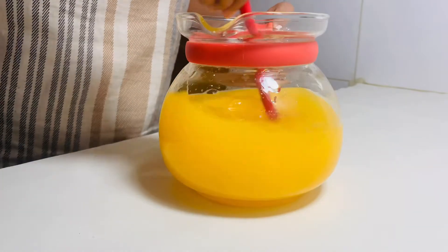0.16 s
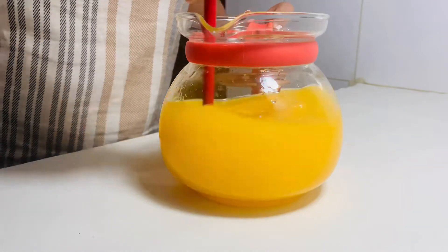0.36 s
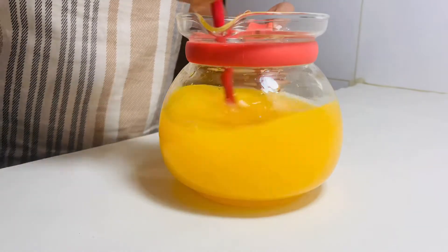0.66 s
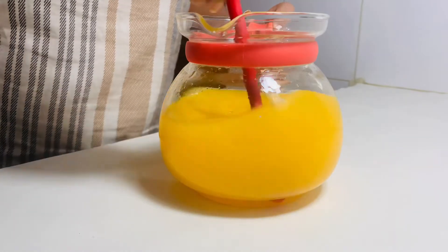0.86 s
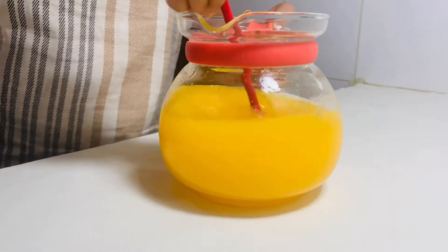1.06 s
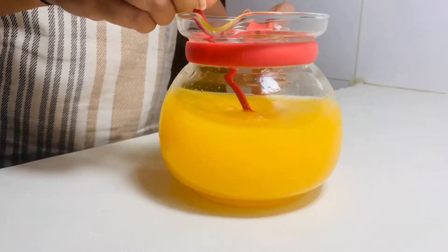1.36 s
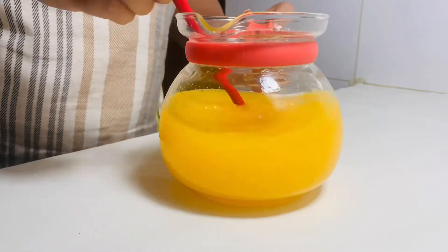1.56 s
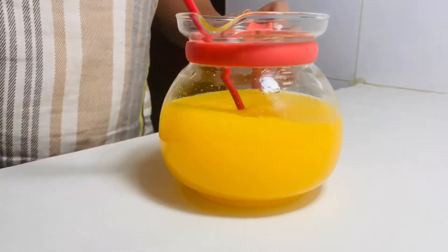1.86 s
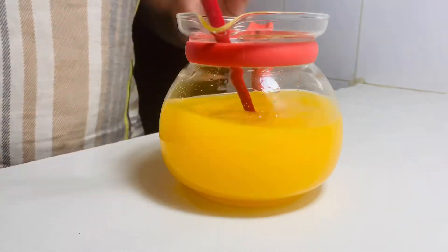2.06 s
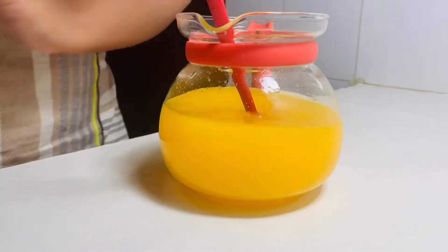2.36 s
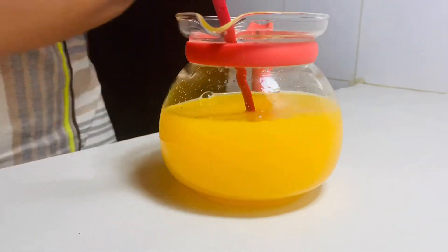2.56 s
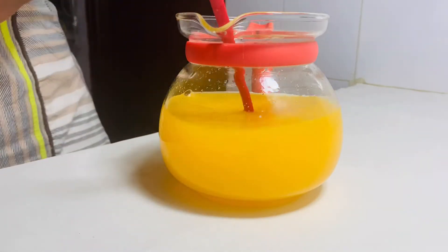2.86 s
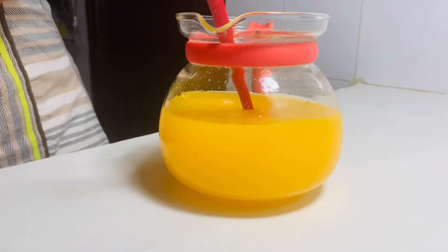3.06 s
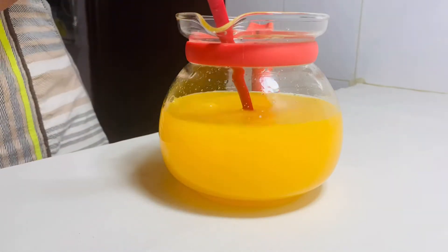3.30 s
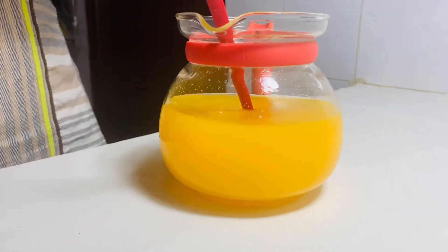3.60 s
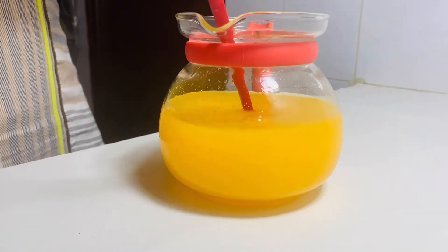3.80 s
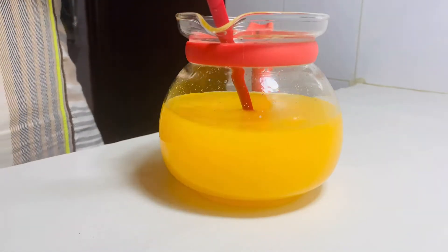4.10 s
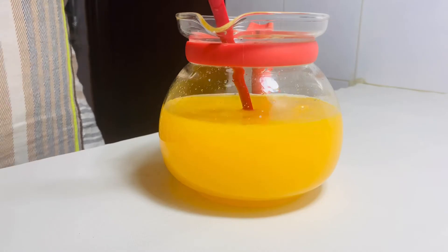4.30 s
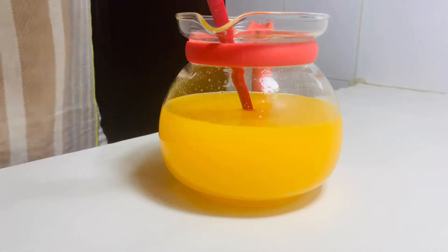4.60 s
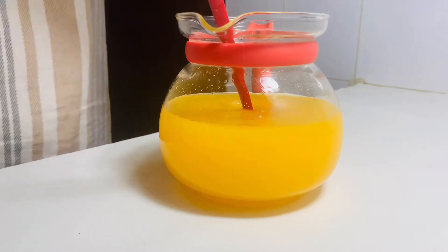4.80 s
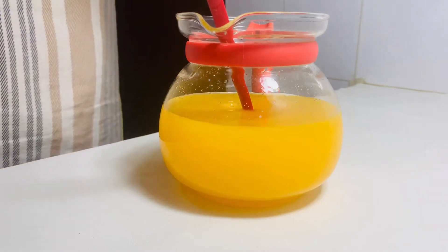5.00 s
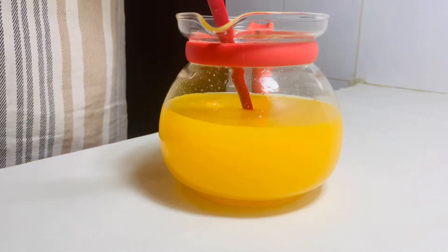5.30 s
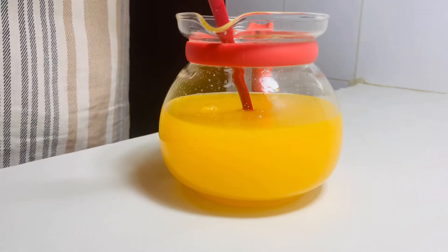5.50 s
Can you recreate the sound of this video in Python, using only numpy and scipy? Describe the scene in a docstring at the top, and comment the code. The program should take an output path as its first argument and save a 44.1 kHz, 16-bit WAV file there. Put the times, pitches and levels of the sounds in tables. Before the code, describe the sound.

Close stereo pickup of a quiet kitchen with a short hard echo. Spoon touches on a juice-filled glass jug, with watery swirls and bubbles, end in a crisp cluster of clinks. After a soft cloth swish comes a low gulp and a quick booming tub clatter slightly farther off, then a crackling, hollow pour that becomes fine hiss and stops with stray ticks.

```python
"""In a small kitchen, a spoon stirs juice in a round glass jug: it ticks on the wall, the juice plops,
and the handle clinks to rest in the neck. Each touch is a click of noise plus fading glass tones.
Clothes rustle as soft noise; then a hollow tub is picked up with two low gulps and bumped down, booming.
Something is poured: gushes of noise that sound the air in the tub, and a fine hiss that swells and dies away.
Single grains tick in the stream, and low room noise with a hum lies under it all."""
import sys
import numpy as np
from scipy import signal
from scipy.fft import rfft, irfft
from scipy.io import wavfile
from scipy.ndimage import uniform_filter1d

SR = 44100
rng = np.random.default_rng(int(sys.argv[2]) if len(sys.argv) > 2 else 0)


def unload_wav(signal):
    """Save mono or channel-first audio to the path in sys.argv[1] as 16-bit WAV at rate SR, clipped to [-1, 1]."""
    wavfile.write(
        sys.argv[1],
        SR,
        np.round(np.clip(np.atleast_2d(signal).T, -1, 1) * 32767).astype(np.int16),
    )


N = 249165  # length in samples
TIME = np.arange(N) / SR  # s

# All levels in the tables are relative: each source adds its own gain later.

# The kitchen at rest, colour of its noise: [f/Hz, level/dB]
FLOOR_COLOUR = [(20, -36), (40, 3), (60, 1.5), (120, 6.5), (180, -1), (300, -6.5), (450, -5.5), (700, -20),
                (1200, -23), (3000, -27.5), (8000, -31), (16000, -28.5)]
# Mains hum: [f/Hz, level/dB]
HUM_TONES = [(117, -72), (234, -77), (351, -86), (467, -81.5)]
# How long the room's echo takes to fade by 60 dB: [f/Hz, t60/s]
ROOM_T60 = [(100, 0.86), (500, 0.4), (2000, 0.37), (3200, 0.38), (4600, 0.41), (6500, 0.33), (10000, 0.27),
            (16000, 0.16)]
# Colour of the room's echo: [f/Hz, level/dB]
ROOM_COLOUR = [(60, -9), (500, 0), (4000, -1.5), (8000, -4), (16000, -1)]
# How alike noise is at the two microphones: [f/Hz, likeness from 0 to 1]
LIKENESS = [(60, 0.65), (250, 0.8), (600, 0.28), (1000, 0.3), (1700, 0.34), (2800, 0.23), (6000, 0.033),
            (8000, 1), (16000, 1)]
# How much louder noise is on the left than on the right: [f/Hz, level/dB]
BALANCE = [(60, -5.5), (130, -6.5), (300, -5), (550, 0.5), (2000, 0.5), (5000, -2.5), (8000, -0.5)]
# How far the left microphone leads, apart from the delay below: [f/Hz, turn/rad]
LEFT_TURN = [(100, 0), (240, 1.8), (330, 3.4), (490, 2), (600, 3), (1000, 2.5), (1700, 6.28)]
LEFT_LAG_S = 0.0001763  # the left microphone hears the sound this much later
TREBLE_LIMIT_HZ = 15900

# Colour of rustling cloth: [f/Hz, level/dB]
CLOTH_COLOUR = [(150, -4), (400, 8.5), (800, -4), (4500, -6.5), (7000, -15), (16000, -23.5)]
# Swishes of clothing: [t/s, hold/s, level/dB]
SWISHES = [(2.344, 0.006, -69), (2.458, 0.0064, -65.5), (2.55, 0.016, -66), (2.65, 0.02, -64.5),
           (3.106, 0.072, -62.5)]
SWISH_RISE_S, SWISH_FALL_S = 0.014, 0.052

# Colour of the coarse gushes: [f/Hz, level/dB]
GUSH_COLOUR = [(80, -22), (280, 8.5), (450, -2.5), (800, -12.5), (1250, 1.5), (1750, 10), (2050, 5.5),
               (2700, 2), (3600, 3), (4500, -6.5), (5900, -12), (7000, 0), (9000, -41), (16000, -18)]
# Resonances that colour the gushes: [f/Hz, width/Hz, level/dB]
GUSH_PEAKS = [(832, 62, 17), (1066, 14, 9), (2378, 66, 11.5), (2660, 68, 14.5), (3100, 140, 8.5),
              (4560, 340, 13.5)]
PEAK_DRIFT_DB = .1  # slight drift of their pitch (dB of frequency)
# Gushes of the pour; the last two are faint swells of the tub's tone within the stream:
# [t/s, hold/s, coarse rush level/dB, fine hiss level/dB, level of the air in the tub/dB]
GUSHES = [(3.7, 0.12, -64.5, -76.5, -52.5), (3.872, 0.014, -59, -72, -38.5),
          (3.911, 0.03, -49.5, -47.5, -44), (4.039, 0.009, -51, -50.5, -40.5),
          (4.14, 0.11, -44, -42, -43.5), (4.477, 0.029, -60, -77, -60), (4.577, 0.021, -77, -79, -65)]
GUSH_RISE_S, GUSH_FALL_S = 0.018, 0.021
CAVITY_RISE_S, CAVITY_FALL_S = 0.013, 0.024  # the air in the tub follows each gush loosely
# The stream that follows swells, then dies away, by its fine hiss: [t/s, level/dB]
STREAM = [(4.323, -52), (4.66, -49.5), (4.849, -44.5), (5.111, -56), (5.2, -71)]
# It starts coarse, still sounding the air in the tub; both fade as it grows finer.
COARSE_DB, COARSE_FADE_DB_PER_S = -9.5, 34
HOLLOW_DB, HOLLOW_FADE_DB_PER_S = -11, 53
# Colour of the fine hiss: [f/Hz, level/dB]
HISS_COLOUR = [(600, -89), (1100, -28), (1700, -11.5), (2500, -3), (4500, 0.5), (6500, 1.5), (7800, -4),
               (9300, 4), (12000, -1.5), (15700, 4)]
GRAIN_DB, SURGE_DB = 1.8, 1.4  # unevenness of the hiss: quick clumps and slower surges
# Resonance of the air in the tub: [t/s, f/Hz]
CAVITY_PITCH = [(3.72, 587), (3.82, 549), (3.93, 564.6), (4.06, 568), (4.14, 550), (4.24, 549.6),
                (4.4, 530), (4.5, 519), (4.62, 535)]
CAVITY_WIDTH_HZ, PULSING_DB = 48, 3  # width of that resonance, depth of its uneven pulsing
# Stray grains that land alone, mostly as the stream ends: [t/s, level/dB]
STRAYS = [(4.322, -33.5), (4.97, -38), (5.008, -37), (5.092, -42), (5.109, -34), (5.216, -43.5),
          (5.268, -49), (5.32, -34.5)]
STRAY_S = .0014  # decay of the tick of a stray or larger grain
LARGE_PER_S = 130  # larger grains landing each second, on average

# Tones of the tub's body: [f/Hz, level/dB, t60/s]
TUB_MODES = [(59.6, -16.5, 0.5), (103.6, -6, 0.14), (237.4, -1, 0.17), (292.6, -6.5, 0.22), (491, -7, 0.19),
             (724, -16, 0.32), (994, -17.5, 0.16)]
# Knocks on the tub: [t/s, thud and boom level/dB, clack level/dB, clack decay/s, snap level/dB]
KNOCKS = [(3.227, -52, -45.5, 0.01, -36), (3.260, -64.5, -38.5, 0.0049, -35),
          (3.28, -48.5, -39.5, 0.0062, -44), (3.36, -52, -51, 0.043, -54),
          (3.392, -31.5, -21.5, 0.0061, -35), (3.405, -48, -29.5, 0.004, -46),
          (3.427, -35, -16.5, 0.0032, -45), (3.44, -46.5, -31, 0.0076, -63.5),
          (3.459, -34.5, -36, 0.0032, -38.5), (3.488, -32.5, -45, 0.0079, -37),
          (3.511, -43, -38, 0.01, -41.5), (3.532, -45, -35, 0.006, -43), (3.551, -39.5, -43, 0.024, -46),
          (3.58, -44, -50, 0.015, -53), (4.496, -87, -37.5, 0.0051, -46), (4.576, -56, -31, 0.0039, -37.5),
          (4.605, -65.5, -58, 0.006, -54)]
# Colour of the clack in the tub's walls: [f/Hz, level/dB]
CLACK_COLOUR = [(35, -1), (60, 12), (130, 0.5), (190, -17), (380, -2), (700, -4), (1050, -2.5),
                (1450, -6.5), (1900, 6), (2350, 2.5), (2900, 7.5), (3600, -5), (4600, -0.5), (6200, -21.5),
                (9000, -37), (16000, -34)]
# Colour of the snap at its edge, also used for landing grains: [f/Hz, level/dB]
SNAP_COLOUR = [(300, -37.5), (1500, -16.5), (3000, -0.5), (5500, 3), (9000, 3.5), (12000, -2.5),
               (16000, -6.5)]
# Colour of the thud of its body: [f/Hz, level/dB]
THUD_COLOUR = [(150, -16.5), (370, -16), (490, -1), (590, -12.5), (700, 7.5), (830, -2.5), (1000, -8),
               (1400, -20), (3000, -39.5)]
SNAP_S = 0.0053  # decay of a snap

# Colour of the swirling juice: [f/Hz, level/dB]
SWIRL_COLOUR = [(150, -15.5), (400, 1), (1000, -16.5), (2000, -14), (4500, -9.5), (7000, -13),
                (11000, -14.5), (16000, -37)]
# Strokes of the spoon that stir up the surface: [t/s, hold/s, level/dB]
STROKES = [(.005, 0.077, -57.5), (0.135, 0.033, -68), (0.258, 0.065, -61.5), (0.496, 0.037, -58.5),
           (0.654, 0.1, -70.5), (1.36, 0.02, -71)]
STROKE_RISE_S, STROKE_FALL_S = 0.032, 0.0039
# Short hollow tones: plops in the juice, then two low gulps as the tub is picked up:
# [t/s, level/dB, f/Hz, t60/s, glide in octaves/s]
HOLLOW_TONES = [(.394, -47, 714, 0.17, 11), (.418, -26.5, 721, 0.044, 6), (.428, -34.5, 618, 0.051, 4.5),
                (0.854, -24, 730, 0.092, -0.5), (0.499, -44, 1730, 0.057, 6.5),
                (0.508, -46, 1500, 0.026, 12), (0.52, -41.5, 2037, 0.063, 2.5),
                (0.857, -45, 1142, 0.16, 1.6), (0.877, -30, 733, 0.073, 4), (2.312, -39, 429, 0.025, 16),
                (3.242, -38.5, 271, 0.27, 9.5), (3.277, -40, 407, 0.13, -0.5)]
# Tiny bubbles and droplets that pop on the juice: [t/s, level/dB]
POPS = [(.335, -39), (0.381, -37), (.626, -41), (0.679, -45.5), (1.837, -48.5), (2.436, -41)]
POP_S = 0.0026  # decay of a pop
BUBBLE_COUNT, STIR_END_S = 70, .8  # small bubbles stirred up, all starting before this time

# Tones of the jug; the lowest two are the jug rocking on the counter: [f/Hz, t60/s before RING_SHARE]
GLASS_MODES = [(136, .2), (470, .1), (1179, .18), (1401, .12), (1612, .13), (2075, .14), (2885, .12),
               (3010, .08), (3105, .09), (3525, .13), (3872, .065), (4272, .09), (4500, .12), (4630, .07),
               (5412, .17), (6180, .08), (6450, .07), (7600, .07), (9330, .07), (9935, .06)]
# One row for each of these tones, one column for each place struck:
# [low on the wall level/dB, high on the wall level/dB, rim level/dB, neck level/dB]
GLASS_LEVELS = [(-16.5, -30.5, -12, -6), (-26.5, -27.5, -26, -20), (-9, -1, -24, -25.5),
                (-48, -27, -6, -16.5), (-5, -17.5, -8, -7.5), (-11, 1, -17, -15.5), (-2, -13.5, -17, -36),
                (4, -16.5, -1.5, -24), (0, 3.5, -16, -5), (-16, -22.5, -24, -17.5), (-2.5, -22.5, -11, 2.5),
                (2, -4.5, -0.5, -2), (-30.5, -25.5, 0.5, -6), (-20, -18.5, -4, -11.5),
                (-12, -21.5, -20, -12), (6, -12.5, -11, -24), (5.5, -10, -20, -12),
                (-27.5, -21.5, -17, -21), (-20, -23.5, -34, -23.5), (-26.5, -19.5, -9, -15)]
PLACES = ("low", "high", "rim", "neck")
# Share of its ring time the glass keeps: the juice damps touches low on the wall.
RING_SHARE = {"low": 0.6, "high": 1.0, "rim": 0.9, "neck": 0.75}
# Decay of the click of a touch at each place (s)
CONTACT_S = {"low": 0.0046, "high": 0.017, "rim": 0.011, "neck": 0.0047}
# Spoon on glass; the short note changes with the spoon's angle: [t/s, ring level/dB,
# dull click level/dB, bright click level/dB, note f/Hz, note level/dB, place struck]
CLINKS = [(0.003, -61, -63, -51.5, 730, -48, "high"), (0.057, -58.5, -60.5, -45.5, 2060, -59, "low"),
          (0.109, -62.5, -53, -58, 3030, -44.5, "low"), (0.256, -51, -49.5, -35, 6480, -47, "low"),
          (0.417, -44.5, -40.5, -21.5, 5090, -37, "low"), (0.503, -59, -52, -47.5, 1380, -51, "high"),
          (0.577, -67, -64, -59, 3066, -53, "low"), (0.627, -73, -60.5, -57, 4140, -58.5, "low"),
          (0.682, -71.5, -70, -61.5, 4260, -62, "low"), (0.852, -45, -39.5, -18, 2134, -39.5, "low"),
          (0.983, -68, -50, -47.5, 2094, -43, "high"), (1.332, -56, -53.5, -54.5, 1806, -53, "high"),
          (1.353, -54, -61, -65.5, 1183, -54, "high"), (1.506, -27.5, -42.5, -31, 7370, -47.5, "rim"),
          (1.519, -43.5, -54.5, -46, 4770, -37.5, "rim"), (1.528, -33.5, -35, -26.5, 2087, -37.5, "rim"),
          (1.772, -66.5, -54, -57, 1600, -45.5, "high"), (1.826, -65.5, -64, -60.5, 3050, -64, "rim"),
          (2.027, -60, -35.5, -11, 7170, -38.5, "neck"), (2.0291, -32, -44.5, -38.5, 4280, -39.5, "neck"),
          (2.044, -28, -43.5, -14.5, 4500, -44.5, "neck"), (2.054, -42.5, -42, -18, 1980, -50, "neck"),
          (2.067, -69.5, -31.5, -42, 1620, -53, "neck"), (2.292, -59, -53, -82, 4430, -76, "neck"),
          (2.378, -63, -67, -73, 1660, -62, "neck")]
# Colour of the dull click: [f/Hz, level/dB]
DULL_COLOUR = [(100, -15.5), (500, 1.5), (900, -4.5), (1400, -1.5), (2000, -1.5), (2450, -2.5),
               (3100, -1.5), (4500, -3.5), (5800, -7.5), (6500, 1), (8000, -22.5), (16000, -31.5)]
# Colour of the bright click, also used for pops on the juice: [f/Hz, level/dB]
BRIGHT_COLOUR = [(500, -37), (3000, -39.5), (5200, -3), (5900, -13), (6500, -7.5), (8500, 6), (9400, 9.5),
                 (10800, -1), (12000, 0), (13200, -4.5), (15500, 4.5)]
DULLED_ABOVE_HZ = 9160  # the handle, at the rim and neck, clicks less brightly than the bowl
NOTE_T60_S = 0.05  # ring time of a touch's own note
WIDE_HZ = 480  # tones below this reach both microphones more nearly in step
SLOSH_BEND, SLOSH_DB = .006, 3  # sloshing bends the pitch (share) and the level (dB) of the tones
SLOSH_RETUNE = .005  # how far the juice level retunes a tone from touch to touch (share)


def amp(db):
    """Turns decibels into a gain."""
    return 10 ** (np.asarray(db) / 20)


def unit(x):
    """Scales a sound to an average (rms) strength of 1."""
    return x / np.sqrt(np.mean(x ** 2) + 1e-20)


def read(points, hz):
    """Reads a table between its points, along a log-frequency axis."""
    f, value = np.transpose(points)
    return np.interp(np.log(hz + 1), np.log(f + 1), value)


def add(mix, s, sound):
    """Mixes a sound in at time s."""
    part = mix[:, max(round(s * SR), 0):][:, :sound.shape[1]]
    part += sound[:, :part.shape[1]]


def noise(colour):
    """Coloured noise as two microphones hear it: partly alike, with the left one late."""
    hz = np.fft.rfftfreq(N, 1 / SR)
    shared, separate = rfft(rng.standard_normal((2, N)))
    same = np.clip(read(LIKENESS, hz), -1, 1)
    tilt = amp(read(BALANCE, hz) / 2)
    left = same * shared + np.sqrt(1 - same ** 2) * separate
    left = left * np.exp(-2j * np.pi * hz * LEFT_LAG_S)
    spectrum = np.array([left * tilt, shared / tilt]) * amp(read(colour, hz))
    return unit(irfft(spectrum, N))


def flicker(depth_db, size):
    """A random gain of mean power 1 that changes about every size samples."""
    wander = unit(uniform_filter1d(rng.standard_normal(N), size))
    return unit(amp(depth_db * np.clip(wander, -3, 3)))


def burst(s, db, decay):
    """Envelope of one contact: a rise in about a millisecond and an exponential fall."""
    t = np.arange(SR // 4) / SR
    envelope = np.zeros((1, N))
    shape = (1 - np.exp(-t / 0.0009)) * np.exp(-t / decay)
    add(envelope, s, (amp(db) * shape)[None])
    return envelope


def swell(s, hold, db, rise, fall):
    """Envelope of one movement: it rises to its level at s, holds, and falls away."""
    before = np.maximum(s - TIME, 0)
    after = np.maximum(TIME - s - hold, 0)
    return amp(db) * np.exp(-before / rise - after / fall)


def ring(hz, db, t60, rise, apart, waver, rough_db):
    """Dying tones that waver in pitch and level; the left channel leads by apart radians."""
    t = np.arange(SR // 2) / SR
    knots = np.linspace(0, t[-1], 70)
    sides = np.array([[.5], [-.5]])
    out = np.zeros((2, len(t)))
    for k in range(len(hz)):
        drift, rough = (np.interp(t, knots, row) for row in rng.standard_normal((2, len(knots))))
        turns = np.cumsum(hz[k] * (1 + waver * drift)) / SR
        build_up = 1 - np.exp(-t * hz[k] / rise)  # takes about rise cycles
        envelope = np.exp(-np.log(1000) * t / t60[k]) * build_up
        wave = np.sin(2 * np.pi * turns + sides * apart[k])
        out += amp(db[k] + rough_db * rough) * envelope * wave
    return out


def resonate(x, hz, width):
    """A resonance of gain 1 at its centre, which follows the curve hz."""
    turn = np.exp(2j * np.pi * np.cumsum(hz) / SR)
    r = np.exp(-np.pi * width / SR)
    # Shift the centre down to 0 Hz, smooth there, and shift back up.
    return 2 * (turn * signal.lfilter([1 - r], [1, -r], x / turn)).real


def left_lead(hz):
    """Radians by which the left microphone leads the right, delay included."""
    return read(LEFT_TURN, hz) - 2 * np.pi * hz * LEFT_LAG_S


def background(floor_db=-66):
    """Low room noise with a wavering mains hum made of steady-pitched sines."""
    hum = 0
    for hz, db in HUM_TONES:
        tone = np.sqrt(2) * np.sin(2 * np.pi * (hz * TIME + rng.random()))
        hum = hum + amp(db) * tone * flicker(3.0, size=6000)
    return amp(floor_db) * noise(FLOOR_COLOUR) + hum * amp([[-3], [2]])


def kitchen(x):
    """A dense tail off tiles and counter: noise in which each band dies at its own speed."""
    hz, t, z = signal.stft(noise(ROOM_COLOUR)[:, :SR * 3 // 4], SR, nperseg=256)
    fade = np.exp(-np.log(1000) * t / read(ROOM_T60, hz)[:, None])
    tail = signal.istft(z * fade, SR, nperseg=256)[1]
    tail *= 1 - np.exp(-TIME[:tail.shape[1]] / 0.0015)
    tail /= np.linalg.norm(tail[1])
    return signal.fftconvolve(x[1:], tail, axes=1)[:, :N]  # the right channel feeds both tails


def clothes():
    """Soft swishes of cloth as the cook turns away: noise that swells and fades."""
    return noise(CLOTH_COLOUR) * sum(swell(*row, SWISH_RISE_S, SWISH_FALL_S) for row in SWISHES)


def flow():
    """Strength of the pour's coarse rush, fine hiss and cavity tone: gushes, and a stream growing finer."""
    coarse = sum(swell(s, hold, db, GUSH_RISE_S, GUSH_FALL_S) for s, hold, db, _, _ in GUSHES)
    fine = sum(swell(s, hold, db, GUSH_RISE_S, GUSH_FALL_S) for s, hold, _, db, _ in GUSHES)
    hollow = sum(swell(s, hold, db, CAVITY_RISE_S, CAVITY_FALL_S) for s, hold, _, _, db in GUSHES)
    s, db = np.transpose(STREAM)
    stream = swell(s[0], s[-1] - s[0], np.interp(TIME, s, db), GUSH_RISE_S, GUSH_FALL_S)
    age = np.maximum(TIME - s[0], 0)
    coarse = coarse + stream * amp(COARSE_DB - COARSE_FADE_DB_PER_S * age)
    hollow = hollow + stream * amp(HOLLOW_DB - HOLLOW_FADE_DB_PER_S * age)
    return coarse, fine + stream, hollow


def pour(gush_db=5, hiss_db=3, cavity_db=-2.5, crackle_db=3.0):
    """Crackling gushes through drifting resonances, a fine grainy hiss, and the air stirred in the tub."""
    coarse, fine, hollow = flow()
    rush = noise(GUSH_COLOUR) * flicker(crackle_db, size=60)
    shift = flicker(PEAK_DRIFT_DB, size=4000)
    peaks = sum(amp(db) * resonate(rush, hz * shift, width) for hz, width, db in GUSH_PEAKS)
    gush = unit(rush + peaks) * coarse * amp(gush_db)

    unevenness = flicker(GRAIN_DB, size=50) * flicker(SURGE_DB, size=1100)
    hiss = noise(HISS_COLOUR) * fine * amp(hiss_db) * unevenness

    pitch = np.interp(TIME, *np.transpose(CAVITY_PITCH))
    air = resonate(noise(GUSH_COLOUR), pitch, CAVITY_WIDTH_HZ)
    air = resonate(air, pitch, CAVITY_WIDTH_HZ)  # twice, for a steeper peak
    air = unit(air) * flicker(PULSING_DB, size=900) * hollow * amp(cavity_db)
    return gush + hiss + air


def grains(per_s=300, grain_db=-12, large_db=-8):
    """Single grains of the stream tick as they land, with sparse larger ones; a few strays stand out."""
    coarse, fine, _ = flow()
    hits = (rng.random(N) < per_s / SR) * np.minimum(rng.exponential(1, N), 3)
    ticks = signal.oaconvolve(hits, np.exp(-TIME[:200] / 0.0052))[:N]
    large_hits = (rng.random(N) < LARGE_PER_S / SR) * rng.random(N)
    large = signal.oaconvolve(large_hits, np.exp(-TIME[:400] / STRAY_S))[:N]
    strays = sum(burst(s, db, STRAY_S) for s, db in STRAYS)
    small_part = unit(ticks) * (coarse + fine) * amp(grain_db)
    large_part = unit(large) * fine * amp(large_db)
    return noise(SNAP_COLOUR) * (small_part + large_part + strays)


def tub(rattle_db=4.5, thud_db=2, thud_s=0.0061):
    """Knocks thud and boom in the hollow body, clack in the walls and snap at the edge."""
    hz, mode_db, t60 = np.transpose(TUB_MODES)
    clack = sum(burst(s, db, decay) for s, _, db, decay, _ in KNOCKS)
    snap = sum(burst(s, db, SNAP_S) for s, *_, db in KNOCKS)
    thud = sum(burst(s, db + thud_db, thud_s) for s, db, *_ in KNOCKS)
    out = noise(CLACK_COLOUR) * flicker(rattle_db, size=90) * clack
    out += noise(SNAP_COLOUR) * snap
    out += noise(THUD_COLOUR) * thud
    for s, boom_db, *_ in KNOCKS:
        boom = ring(hz, mode_db + boom_db, t60, rise=0.99, apart=left_lead(hz), waver=0.01, rough_db=6.0)
        add(out, s, boom * amp([[-2.5], [2.5]]))  # louder on the right
    return out


def stirring():
    """Strength over time of the spoon's strokes."""
    return sum(swell(*row, STROKE_RISE_S, STROKE_FALL_S) for row in STROKES)


def hollow_tone(db, hz, t60, glide):
    """A bubble, plop or gulp: a dying sine whose pitch glides by glide octaves a second."""
    t = np.arange(SR // 4) / SR
    turns = np.cumsum(hz * 2 ** (glide * t)) / SR
    wave = np.sin(2 * np.pi * turns + np.array([[0], [1.8]])) * amp([[2], [-3]])
    return amp(db) * wave * (1 - np.exp(-t / 0.0033)) * np.exp(-np.log(1000) * t / t60)


def juice_and_gulps(swirl_db=-3, lumpy_db=4, bubbles_db=3, low_hz=600, high_hz=2600, cycles=40):
    """A lumpy swirl of noise, small bubbles, tiny pops and plops; then the two low gulps at the tub."""
    strength = stirring()
    out = noise(SWIRL_COLOUR) * strength * amp(swirl_db) * flicker(lumpy_db, size=400)
    out += noise(BRIGHT_COLOUR) * sum(burst(s, db, POP_S) for s, db in POPS)
    for s, *tone in HOLLOW_TONES:
        add(out, s, hollow_tone(*tone))
    for when, pitch, size in rng.random((BUBBLE_COUNT, 3)):
        s = when * STIR_END_S
        hz = low_hz * (high_hz / low_hz) ** pitch
        loudness = size * np.interp(s, TIME, strength)  # follows the strokes
        add(out, s, loudness * hollow_tone(bubbles_db, hz, cycles / hz, glide=4.0))
    return out


def glass(place):
    """One ring of the jug: the place struck sets which tones speak; sloshing retunes and roughens them."""
    hz, t60 = np.transpose(GLASS_MODES)
    hz = hz * (1 + SLOSH_RETUNE * rng.uniform(-1.3, 1, len(hz)))
    db = np.transpose(GLASS_LEVELS)[PLACES.index(place)]
    # Neighbouring tones lead on opposite sides.
    lobes = (-1) ** np.arange(len(hz)) * np.minimum(hz / WIDE_HZ, 1)
    tones = ring(hz, db, t60 * RING_SHARE[place], rise=20.0, apart=lobes,
                 waver=SLOSH_BEND, rough_db=SLOSH_DB)
    return tones * amp([[-1.5], [1.5]])


def spoon(glass_db=3):
    """Each touch clicks, sounds a short note of its own and rings the jug afresh."""
    dull, bright = noise(DULL_COLOUR), noise(BRIGHT_COLOUR)
    handle = signal.lfilter(*signal.butter(2, DULLED_ABOVE_HZ, fs=SR), bright)
    out = np.zeros((2, N))
    for s, ring_db, dull_db, bright_db, note_hz, note_db, place in CLINKS:
        click = handle if place in ("rim", "neck") else bright
        out += (amp(dull_db) * dull + amp(bright_db) * click) * burst(s, 0, CONTACT_S[place])
        add(out, s, amp(ring_db + glass_db) * glass(place))
        note = ring([note_hz], [note_db], [NOTE_T60_S], rise=2.4, apart=[1.0],
                    waver=SLOSH_BEND, rough_db=SLOSH_DB)
        add(out, s, note)
    return out


def scene():
    """Adds up all sources; the tub's knocks send the most sound into the room, as if farther off."""
    jug_and_gulps = spoon() + juice_and_gulps()
    knocks = tub()
    stream = pour() + grains()
    wet = kitchen(amp(-8.0) * jug_and_gulps + amp(-3.5) * knocks + amp(-8.5) * stream)
    return jug_and_gulps + knocks + stream + wet + clothes() + background()


def record(dry):
    """The recorder's bass cut (48 Hz) and treble limit, as two filters."""
    thin = signal.sosfilt(signal.butter(4, 48, "highpass", fs=SR, output="sos"), dry)
    lowpass = signal.firwin(401, TREBLE_LIMIT_HZ, window=("kaiser", 8), fs=SR)
    return signal.oaconvolve(thin, lowpass[None], "same")


dry = scene()
out = record(dry)
unload_wav(out)
```